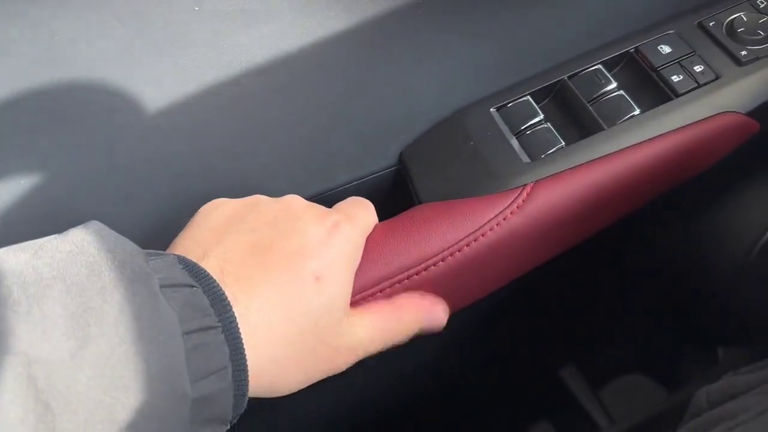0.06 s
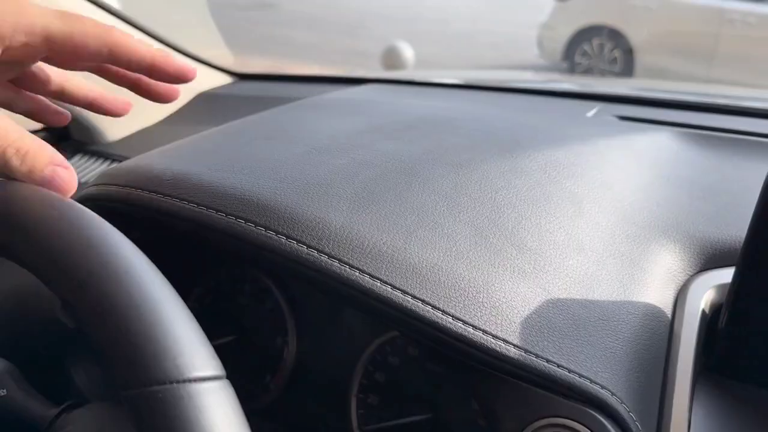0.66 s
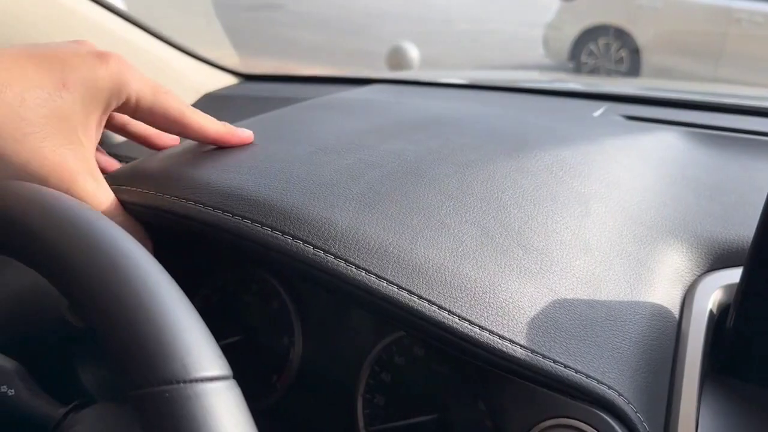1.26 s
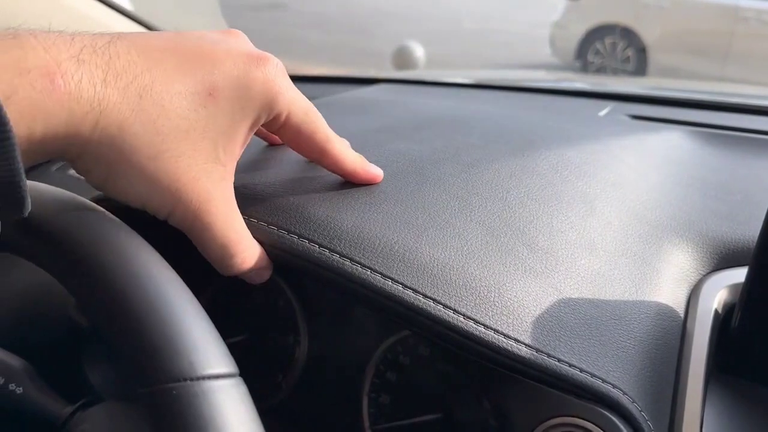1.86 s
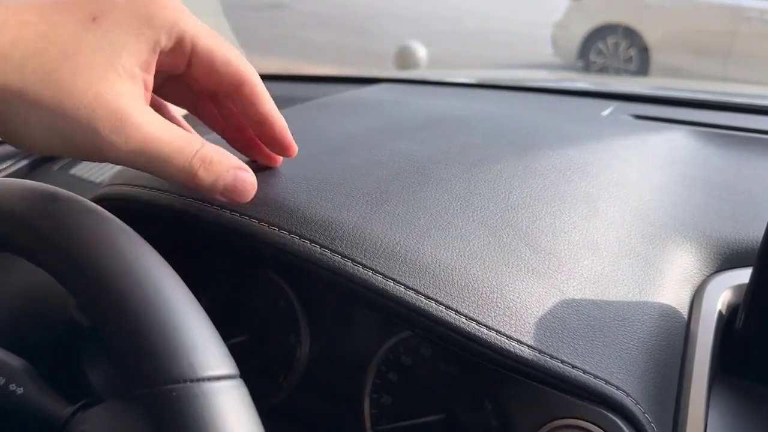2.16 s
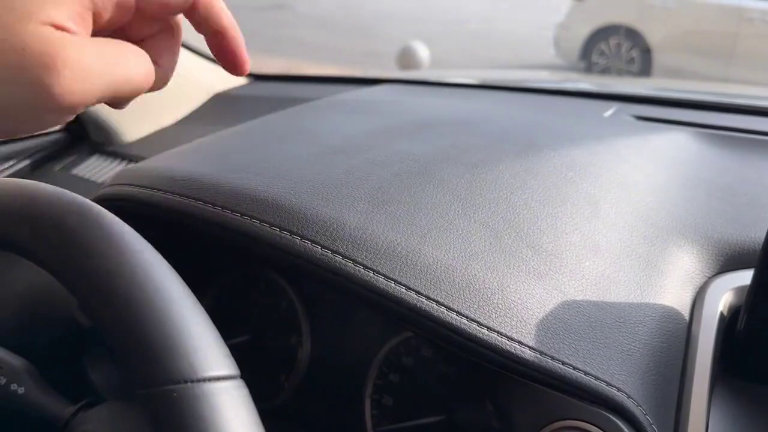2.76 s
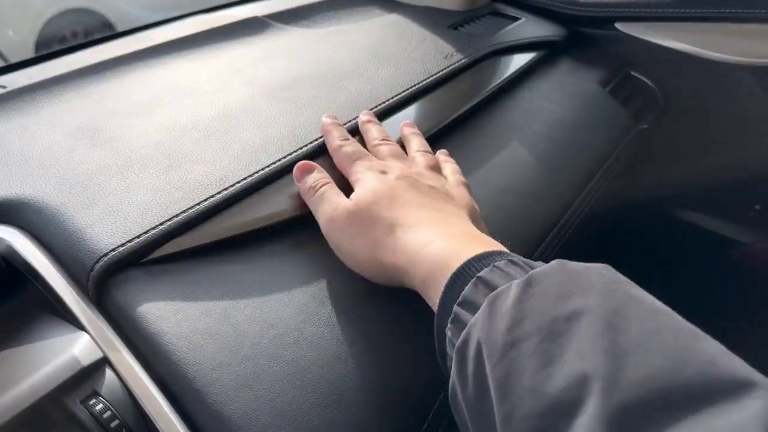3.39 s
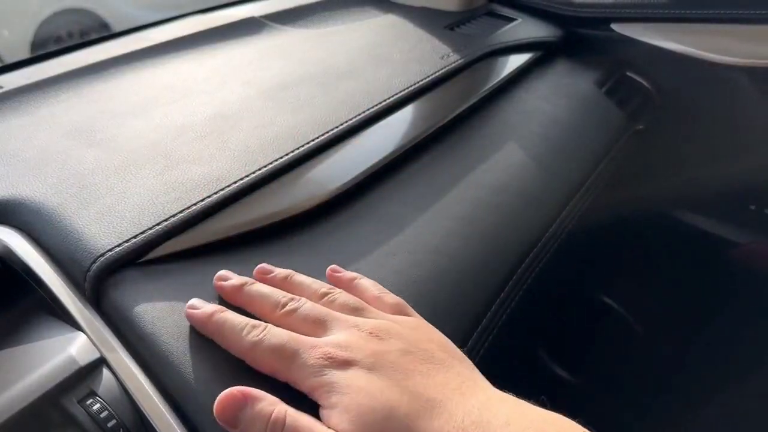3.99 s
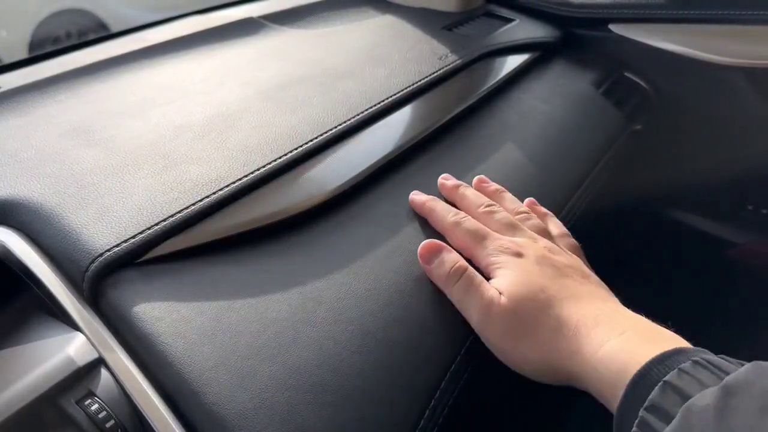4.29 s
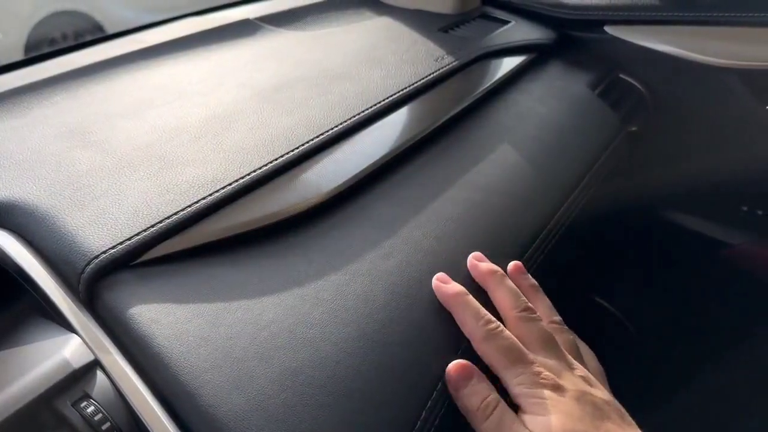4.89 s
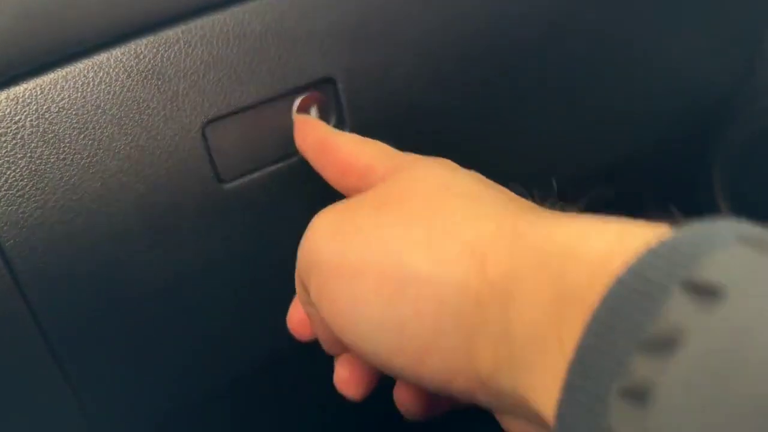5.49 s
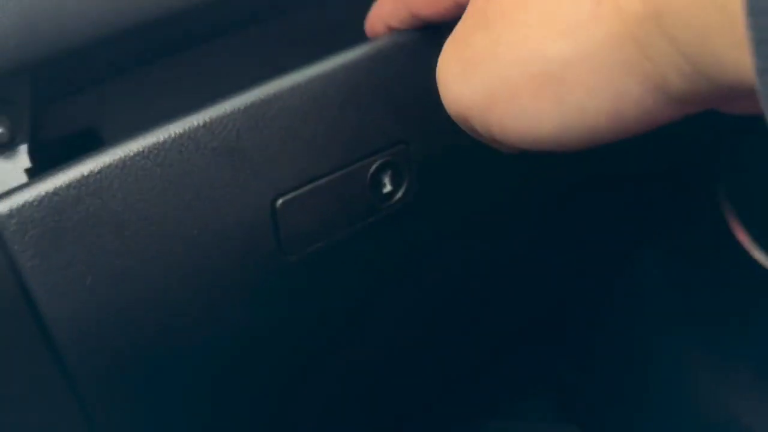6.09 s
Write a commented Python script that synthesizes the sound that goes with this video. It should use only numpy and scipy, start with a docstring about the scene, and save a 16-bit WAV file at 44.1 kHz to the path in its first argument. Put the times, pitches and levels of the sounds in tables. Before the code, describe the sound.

Faint leather creaks, dull dashboard taps and a sliding palm in a quiet car, ending with a glovebox clicking open.

```python
"""Leather creaks faintly under a sliding hand, inside a parked car, close to a stereo microphone.
Fingers press and tap the padded dashboard, which rings dully; a palm hisses over its grain
and a jacket sleeve swishes. Near the end a thumb works the glovebox latch: clicks, a hollow
plastic clack, the thump of the lid. The small, dead cabin booms briefly under each blow
and holds a low rumble."""
import sys
import numpy as np
from scipy import signal
from scipy.fft import rfft, irfft, next_fast_len
from scipy.io import wavfile
from scipy.ndimage import uniform_filter1d

SR = 44100
rng = np.random.default_rng(int(sys.argv[2]) if len(sys.argv) > 2 else 0)


def generate_wav(signal):
    """Clip the signal to [-1, 1] and save it as 16-bit WAV at the path in sys.argv[1]."""
    frames = np.transpose(np.atleast_2d(signal))
    scaled = np.clip(frames, -1, 1) * 32767
    pcm = np.round(scaled).astype(np.int16)
    wavfile.write(sys.argv[1], SR, pcm)


N = 275625
RING_TIME_S = np.arange(SR // 2) / SR


def gain_of(db):
    """Decibels to amplitude."""
    return 10 ** (np.asarray(db) / 20)


def unit_rms(x):
    """Scales to unit rms."""
    return x / np.sqrt(np.mean(x ** 2) + 1e-20)


def curve_at(points, hz):
    """Joins (freq_hz, value) points on a log-frequency axis."""
    freq_hz, value = np.transpose(points)
    return np.interp(np.log(hz + 1), np.log(freq_hz + 1), value)


def add(mix, start_s, sound):
    """Lays a sound into the mix."""
    part = mix[:, max(round(start_s * SR), 0):][:, :sound.shape[-1]]
    part += sound[..., :part.shape[1]]


def coloured(x, points):
    """Filters by a (freq_hz, gain_db) curve."""
    size = next_fast_len(x.shape[-1] + 2048)
    gain = gain_of(curve_at(points, np.fft.rfftfreq(size, 1 / SR)))
    return irfft(rfft(x, size) * gain, size)[..., :x.shape[-1]]


def spread(mid, side):
    """Left and right: narrow in the bass, wide through the treble, nearly mono at the very top."""
    # stereo width: freq_hz, side_gain_db
    width = [(60, -21.5), (200, -8.5), (500, -3.5), (1200, -2.5), (7000, 0.5), (9000, -6.5), (10500, 1),
             (12500, -6), (14200, -31)]
    side = coloured(side, width)
    return np.array([mid + side, mid - side])


def noise(spectrum, size):
    """Stereo noise of a given spectral shape, with a mid of unit rms."""
    pair = spread(*coloured(rng.standard_normal((2, size)), spectrum))
    return pair / pair.mean(0).std()


def wobble(rate_hz):
    """Random motion gliding to a new value rate_hz times a second."""
    knots = rng.standard_normal(N // 8)
    return np.interp(np.arange(N) * rate_hz / SR, np.arange(len(knots)), knots)


def gesture(start_s, rise_s, fall_s, law):
    """One hand movement, from rest to 1 and back; a higher law sharpens the peak."""
    effort = np.interp(np.arange(N) / SR, start_s + np.cumsum([0, abs(rise_s), abs(fall_s)]), [0, 1, 0])
    return np.sin(np.pi / 2 * effort) ** law


def softened(x, corner_hz):
    """A soft contact takes away the high modes."""
    return signal.sosfilt(signal.butter(2, corner_hz, fs=SR, output="sos"), x)


def struck(modes, weights, corner_hz):
    """Decaying modes, each weighted by its motion at the struck spot. Peak 1."""
    ring = sum(weight * gain_of(db - 60 * RING_TIME_S / t60) * np.sin(2 * np.pi * hz * RING_TIME_S)
               for weight, (hz, db, t60) in zip(weights, modes))
    ring = softened(ring, corner_hz)
    return ring / abs(ring).max()


def cabin_rumble():
    """The steady low rumble inside the closed car."""
    # rumble spectrum: freq_hz, relative_db
    spectrum = [(20, -61), (33, -6), (50, 2.5), (70, -5), (110, -13.5), (160, -18.5), (500, -36.5),
                (1500, -49), (15000, -60)]
    return gain_of(-48.5) * noise(spectrum, N)


def cabin_reflections(x):
    """Dense early reflections off glass and trim, soon soaked up by the seats."""
    # cabin reverberation: freq_hz, t60_s
    decay = [(100, 0.33), (400, 0.075), (1500, 0.11), (6000, 0.099), (15000, 0.0044)]
    echoes = rng.standard_normal((2, len(RING_TIME_S))) * (RING_TIME_S > .003)
    hz, t, bands = signal.stft(echoes, SR, nperseg=256)
    fade = gain_of(-60 * t / curve_at(decay, hz)[:, None])
    tail = signal.istft(bands * fade, SR, nperseg=256)[1]
    tail = spread(*tail / np.linalg.norm(tail[0]))
    tail = coloured(tail, [(80, -5), (250, -6), (900, -1.5), (15000, -4)])
    return signal.fftconvolve(x, tail, axes=1)[:, :N]


def sleeve():
    """A jacket sleeve swishes, louder as the arm moves faster."""
    # cloth friction spectrum: freq_hz, relative_db
    spectrum = [(1200, 0), (2900, -5), (5800, 1), (6400, 1), (7300, 4), (9500, -3), (15000, -4.5)]
    # arm movements: start_s, rise_s, fall_s, level_db
    swishes = [(2.598, 0.28, 0.16, -72.5), (4.62, 0.36, 0.046, -55), (4.931, 0.065, 0.6, -47.5),
               (5.42, 0.059, 0.76, -60), (5.8, 0.66, 0.59, -64.5)]
    arm = sum(gain_of(db) * gesture(start, rise, fall, law=1.7) for start, rise, fall, db in swishes)
    return noise(spectrum, N) * arm


def leather_ticks():
    """Leather lets go of the skin: single dry snaps through a broad resonance."""
    # releases: start_s, level_db, pitch_hz
    releases = [(.503, -45, 1250), (0.625, -50.5, 1700), (.647, -41.5, 2000), (.954, -45.5, 1990),
                (.972, -52, 2560), (1.233, -51, 1920), (1.247, -50, 2060), (1.363, -52, 1620),
                (2.921, -54, 1760)]
    decay_s = 0.00097
    out, t = np.zeros((2, N)), RING_TIME_S[:2048]
    for start, db, hz in releases:
        band = signal.iirpeak(hz, Q=1.3, fs=SR)
        burst = rng.standard_normal((2, len(t))) * np.exp(-t / decay_s)
        snap = signal.lfilter(*band, signal.lfilter(*band, burst))
        add(out, start, gain_of(db) * spread(*snap) / abs(snap[0]).max())
    return out


def leather_creaks():
    """Leather sticks and slips: a short run of tiny snaps through one broad resonance."""
    # creaks of leather and trim: start_s, relative_db, pitch_hz, length_s
    creaks = [(0.035, -34.5, 1850, 0.012), (0.16, -45, 2220, 0.094), (0.242, -41, 590, 0.039),
              (0.376, -41, 1390, 0.023), (0.831, -46.5, 680, 0.065), (0.951, -45.5, 1880, 0.03),
              (1.372, -43, 900, 0.0083), (1.965, -30, 1250, 0.0054), (2.938, -37.5, 940, 0.01),
              (3.159, -38, 980, 0.022), (3.234, -31.5, 950, 0.0058), (3.29, -40, 1100, 0.033),
              (3.879, -41.5, 1110, 0.034), (4.759, -44, 960, 0.018), (5.044, -55, 1090, 0.023),
              (5.436, -37.5, 850, 0.058), (5.591, -30, 1000, 0.036), (6.058, -38.5, 710, 0.055)]
    out, t = np.zeros((2, N)), RING_TIME_S[:8192]
    for start, db, hz, length in creaks:
        snaps = rng.standard_normal((2, len(t))) * gain_of(7.6 * rng.standard_normal(len(t)))
        envelope = (1 - np.exp(-t / (0.22 * length))) * np.exp(-(t / length) ** 2)
        mid, side = signal.lfilter(*signal.iirpeak(hz, Q=2.8, fs=SR), snaps * envelope)
        add(out, start, gain_of(db - 11.5) * spread(unit_rms(mid), unit_rms(side)) * envelope.std())
    return out


def palm_hiss():
    """Skin hisses over the leather grain. Returns the hiss and its envelope."""
    # skin friction spectrum: freq_hz, relative_db
    spectrum = [(300, -23), (800, -10.5), (1300, -7), (2200, -6), (2800, -2), (3800, -5), (6000, -2.5),
                (8500, 2), (10500, -2.5), (14000, 0.5)]
    # slides of the hand: start_s, rise_s, fall_s, level_db, focus_db_per_octave
    slides = [(.018, 0.023, 0.098, -50, -1.5), (0.146, 0.038, 0.15, -58, -1.5), (.354, 0.031, .11, -53, -3),
              (0.501, 0.0026, 0.014, -49, -5), (.59, 0.24, 0.19, -58.5, -2.5), (1.29, 0.19, 0.23, -60, 0.5),
              (1.979, .12, .12, -62.5, -3.5), (2.9, 0.088, 0.16, -52.5, -5.5),
              (2.964, 0.054, 0.027, -41.5, -2), (3.06, .13, 0.16, -49.5, -1.5), (3.3, 0.25, 0.26, -41.5, 0),
              (3.6, 0.26, 0.58, -45, 2.5), (3.975, .1, 0.23, -34, -0.26), (4.13, .12, 0.16, -41, 1),
              (4.27, 0.072, 0.077, -48.5, 1), (4.4, 0.24, 0.19, -47, 0.9)]
    sheen_hz = 8800  # positive focus gathers the hiss here, negative spreads it to both sides
    flick_s = 0.12  # slides that stop about this quickly, or quicker, peak more sharply
    hiss, power = np.zeros((2, N)), np.zeros(N)
    hz = np.geomspace(100, SR / 2, 200)
    for start, rise, fall, db, focus in slides:
        swell = gain_of(db) * gesture(start, rise, fall, law=0.73 + flick_s / abs(fall))
        moving = swell > 0
        colour = np.c_[hz, curve_at(spectrum, hz) - focus * abs(np.log2(hz / sheen_hz))]
        hiss[:, moving] += noise(colour, SR)[:, :moving.sum()] * swell[moving]
        power += swell ** 2
    return hiss, np.sqrt(power)


def panel_drag(hiss_envelope):
    """Pressing fingertips and the sliding palm stick and slip: a dull judder in the panel."""
    # drag spectrum: freq_hz, relative_db
    spectrum = [(90, 8), (180, 6), (360, 4.5), (620, 5.5), (1400, -11.5), (2600, -15), (6200, -23.5)]
    # fingertip presses: start_s, rise_s, fall_s, level_db
    presses = [(.68, 0.19, .12, -69), (.9, 0.11, 0.33, -60), (1.96, 0.028, 0.19, -52.5),
               (5.42, 0.036, 0.17, -42), (6.02, 0.062, 0.15, -54)]
    judder_db = 6
    pressure = sum(gain_of(db) * gesture(start, rise, fall, law=2.56)
                   for start, rise, fall, db in presses)
    force = pressure + gain_of(-41.5) * hiss_envelope ** 0.44
    return noise(spectrum, N) * force * gain_of(judder_db * np.tanh(wobble(rate_hz=74.3)))


def rasp(x):
    """Narrow bands of friction swell and fade at random as the contact moves."""
    depth_db, width_hz, lifetime_s = 1.5, 170, .06
    hz, t, bands = signal.stft(x, SR, nperseg=1024)
    patches = rng.standard_normal(bands.shape[1:])
    for _ in range(2):
        patches = uniform_filter1d(patches, round(width_hz / hz[1]), axis=0)
        patches = uniform_filter1d(patches, round(lifetime_s / t[1]), axis=1)
    return signal.istft(bands * gain_of(depth_db * unit_rms(patches)), SR, nperseg=1024)[1][:, :N]


def strokes():
    """Palm and sleeve, roughened by the grain and the uneven hand, over the panel's drag."""
    hiss, envelope = palm_hiss()
    grain_db = 1.03 * wobble(rate_hz=2195)
    hand_db = 1.35 * wobble(rate_hz=43.5)
    drag = panel_drag(envelope)
    return rasp(hiss + sleeve()) * gain_of(grain_db + hand_db) + drag


def slap(decay_s):
    """The short burst of two surfaces meeting."""
    # contact spectrum: freq_hz, relative_db
    spectrum = [(100, 4.5), (600, 17.5), (1800, 3), (3000, 1.5), (4200, -4), (7500, -5), (15000, -11.5)]
    t, attack_s = RING_TIME_S[:4096], 0.000077
    return noise(spectrum, len(t)) * (1 - np.exp(-t / attack_s)) * np.exp(-t / decay_s) / 2


def lid_thump():
    """The glovebox lid's low modes, all pushed the same way at once."""
    # lid modes in the footwell: pitch_hz, relative_db, t60_s
    modes = [(57, -18, .15), (112, 0, .095)]
    return struck(modes, -np.ones(len(modes)), corner_hz=220)


def box_clack(corner_hz):
    """A crowd of short-lived plastic modes, mixed anew by every knock. Unit rms."""
    # colour of the hollow glovebox: freq_hz, relative_db
    colour = [(190, 3), (290, -1), (400, 3.5), (640, 2), (860, 0), (1150, -4), (1580, -4.5), (1780, -1),
              (2500, -3.5), (4000, -11)]
    t, seating_s = RING_TIME_S[:8192], 0.0014
    hz = np.linspace(170, 4500, 110)[:, None]
    hz = hz + rng.uniform(-18, 18, hz.shape)
    t60_s = 0.037 * (hz / 1000) ** -0.12
    envelopes = gain_of(curve_at(colour, hz) - 60 * t / t60_s)
    modes = envelopes * np.sin(2 * np.pi * (hz * t + rng.random(hz.shape)))
    ring = modes.sum(0) * (1 - np.exp(-t / seating_s))
    return unit_rms(softened(ring, corner_hz))


def glovebox():
    """The latch clicks, the hollow box answers with a dry clack, and the lid thumps on its stops."""
    # knocks of latch and lid: start_s, clack_relative_db, corner_hz, click_db, thump_db
    knocks = [(5.346, -24, 870, -43, -60), (5.353, -25, 458, -56, -40), (5.493, -22, 1350, -25.5, -51),
              (5.502, -28, 1960, -30, -18), (5.617, -24, 2220, -32, -37), (5.623, -21, 1390, -27, -22),
              (5.656, -13.5, 1130, -23.5, -24), (5.671, -12.5, 1360, -22.5, -18),
              (6.019, -50, 1190, -42, -74)]
    out = np.zeros((2, N))
    thump = lid_thump()
    for start, db, corner_hz, click_db, thump_db in knocks:
        add(out, start, gain_of(db - 22) * box_clack(corner_hz))
        add(out, start - .001, gain_of(click_db) * slap(decay_s=0.013))
        add(out, start + 0.0018, gain_of(thump_db) * thump)
    return out


def dashboard():
    """Finger blows: a slap of skin, then the padded panel's dull ring, higher where it is stiffer."""
    # fingers and knuckles landing: start_s, level_db, corner_hz, pitch_ratio, slap_db
    taps = [(0.737, -33, 112, 1.07, -45), (.955, -42.5, 352, 1, -66), (1.038, -41.5, 880, 2.1, -64),
            (1.135, -46, 398, 1.96, -70), (1.149, -32.5, 69.5, 1.14, -70), (1.249, -36, 125, 0.81, -51.5),
            (1.773, -40, 107, 1.13, -55.5), (1.969, -25.5, 890, 0.95, -38), (1.993, -31.5, 300, 1.15, -34),
            (2.034, -33.5, 780, 0.85, -54), (2.057, -39.5, 920, 1.08, -47.5),
            (2.3654, -12.5, 387, 0.97, -33.5), (2.5639, -10.5, 920, 0.98, -31), (3.29, -30, 69, 1.48, -42),
            (3.802, -33, 167, 0.98, -40), (5.696, -22.5, 332, .95, -48)]
    # panel modes, scaled by each tap: base_pitch_hz, relative_db, base_t60_s
    modes = [(67, -5, .33), (84, 4, .095), (98, -2, .12), (145, -12, .065), (214, 2.8, .064),
             (274, 2, .048), (415, -6.5, .042), (579, -7.5, .038), (682, -19, .045), (750, -3, .004)]
    out = np.zeros((2, N))
    signs = -(-1) ** np.arange(len(modes))  # neighbours move oppositely: the boom swells after the blow
    for start, db, corner_hz, pitch_ratio, slap_db in taps:
        freedom = min(gain_of(db + 13) ** .13, 1)  # a light finger stays on the panel and damps it
        spot_modes = np.multiply(modes, [pitch_ratio, 1, freedom / pitch_ratio])
        add(out, start, gain_of(db) * struck(spot_modes, signs, corner_hz))
        add(out, start - .003, gain_of(slap_db) * slap(decay_s=.005))
    return out


def scene():
    """The handling close up, with the cabin's reflections and rumble behind it."""
    taps, latch = dashboard(), glovebox()
    leather = leather_creaks() + leather_ticks()
    room = cabin_reflections(gain_of(-11.5) * taps + gain_of(-9.5) * latch + gain_of(-9) * leather)
    return cabin_rumble() + room + leather + strokes() + latch + taps


def record(dry):
    """A close stereo microphone that leans left and sheds the deepest bass; then the band limit."""
    # channel balance: freq_hz, left_over_right_db
    balance = [(60, 0.5), (200, 2), (1500, 0.5), (4500, 2.5), (9000, 3.5), (13000, -1)]
    # in this band the two microphone ports hear in opposite phase, so the mid cancels
    notch_hz, half_width_hz, notch_db = 11200, 1010, -17.5
    size = next_fast_len(N + 4096)
    hz = np.fft.rfftfreq(size, 1 / SR)
    pair = rfft(dry, size)
    mid_gain = gain_of(notch_db * np.exp(-((hz - notch_hz) / half_width_hz) ** 4))
    pair = pair + (mid_gain - 1) * pair.mean(0)
    lean_db = curve_at(balance, hz) * np.array([[1], [-1]]) / 2
    heard = irfft(pair * gain_of(lean_db), size)[:, :N]
    heard = signal.sosfilt(signal.butter(4, 36, "highpass", fs=SR, output="sos"), heard)
    lowpass = signal.firwin(511, 15650, window=("kaiser", 9), fs=SR)
    return signal.oaconvolve(heard, lowpass[None], "same", axes=1)


dry = scene()
out = record(dry)
generate_wav(out)
```